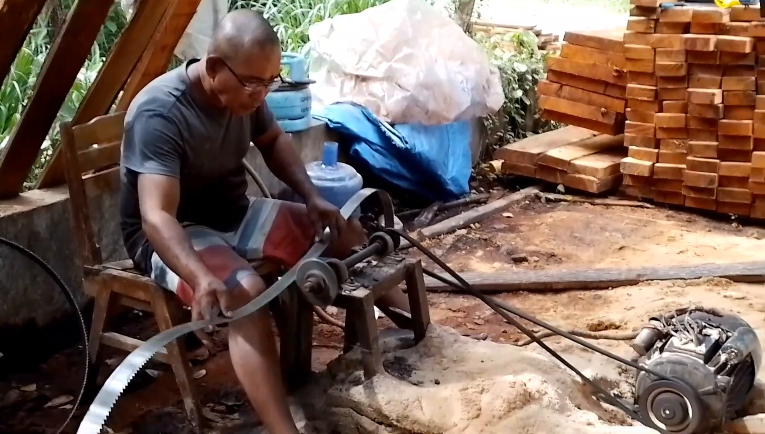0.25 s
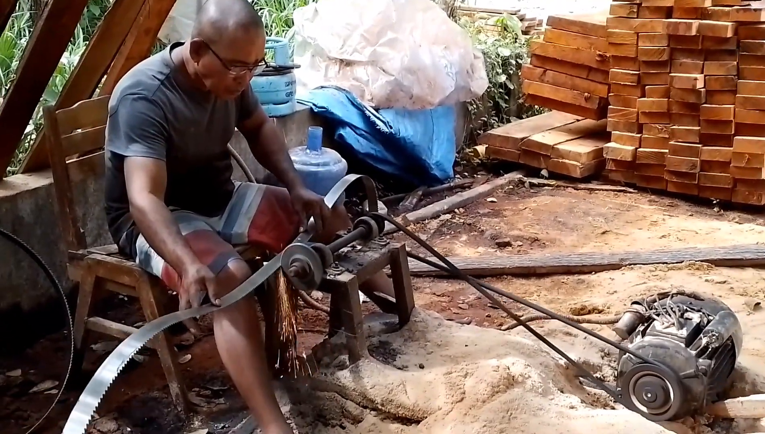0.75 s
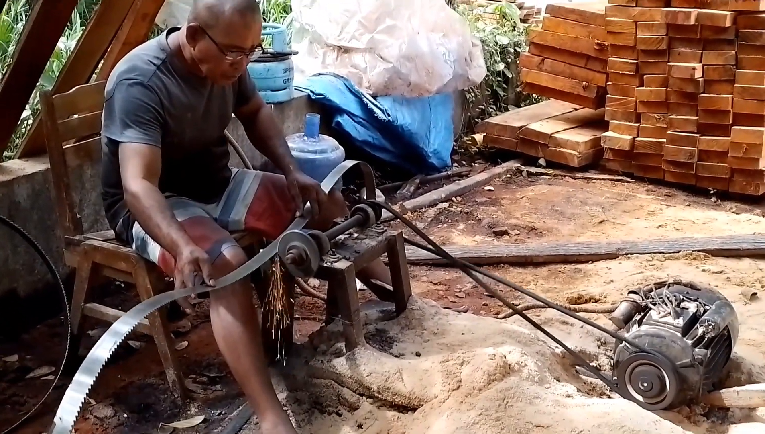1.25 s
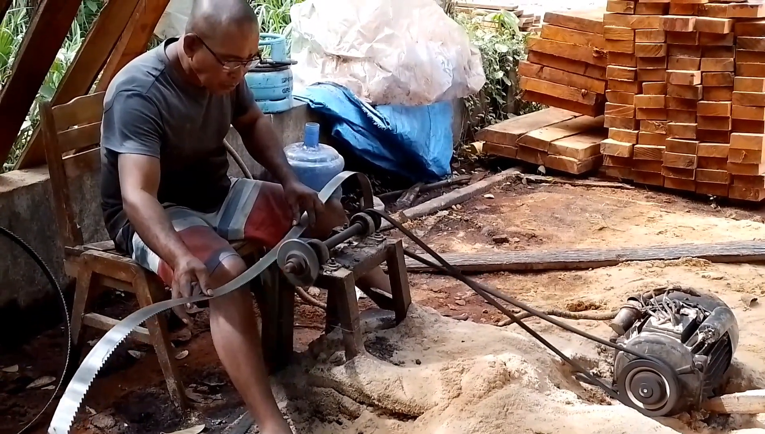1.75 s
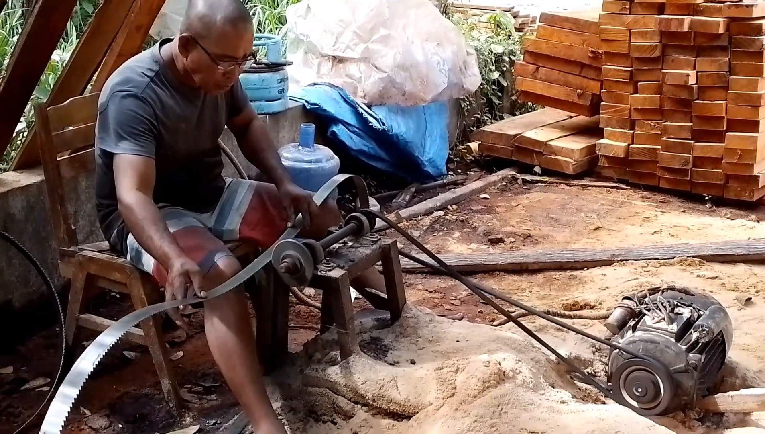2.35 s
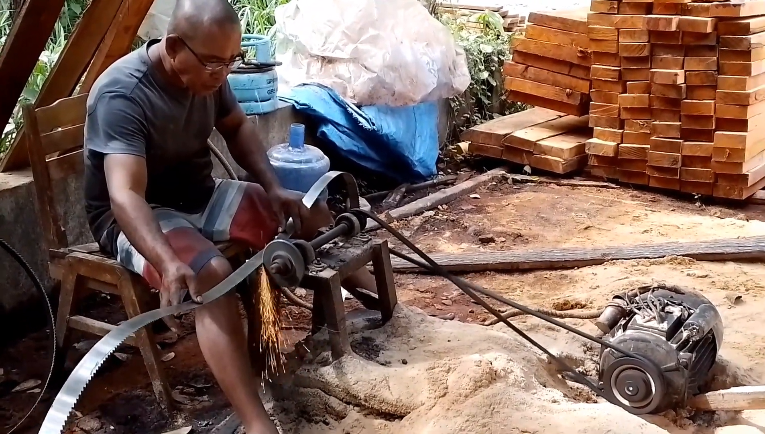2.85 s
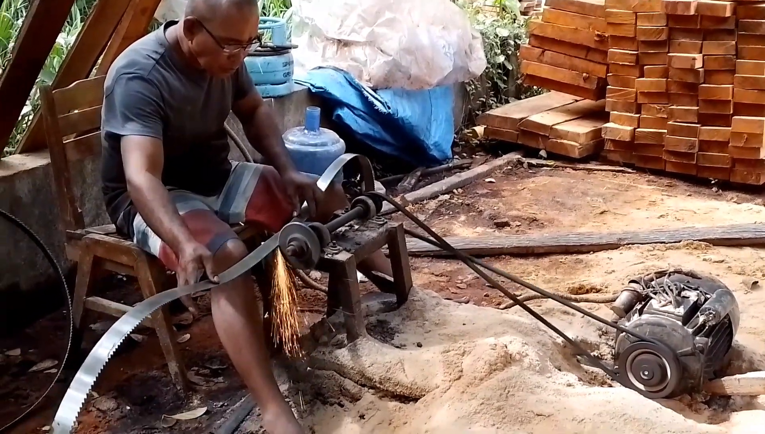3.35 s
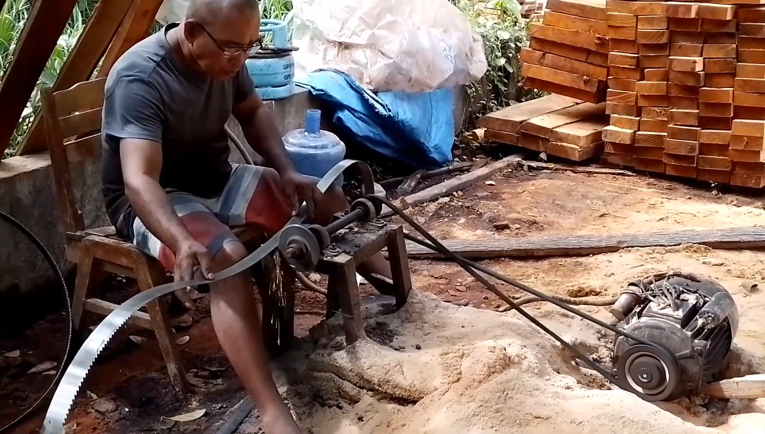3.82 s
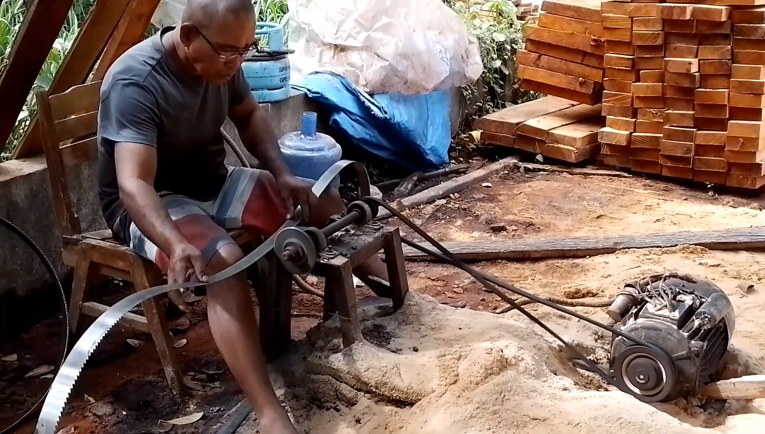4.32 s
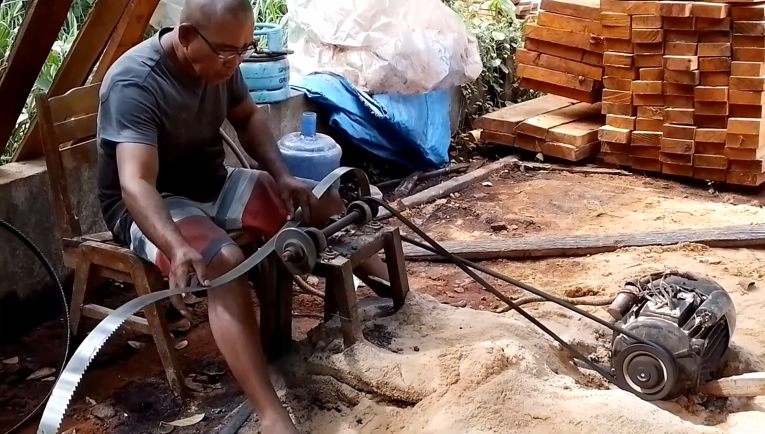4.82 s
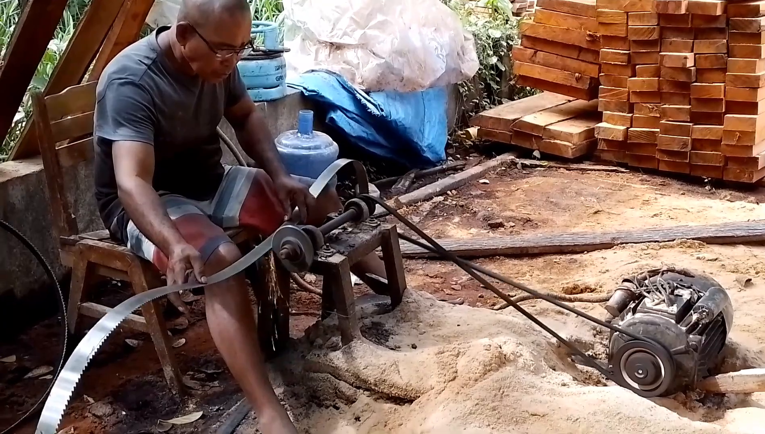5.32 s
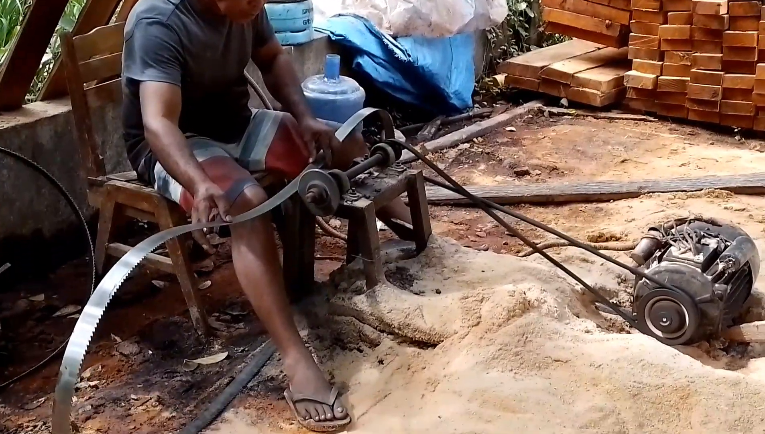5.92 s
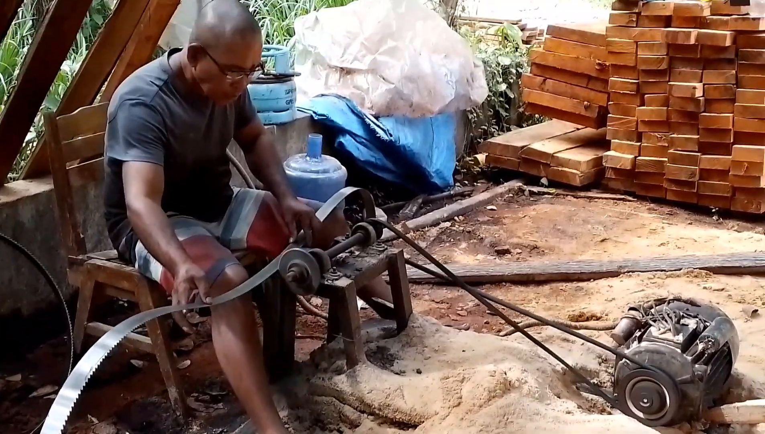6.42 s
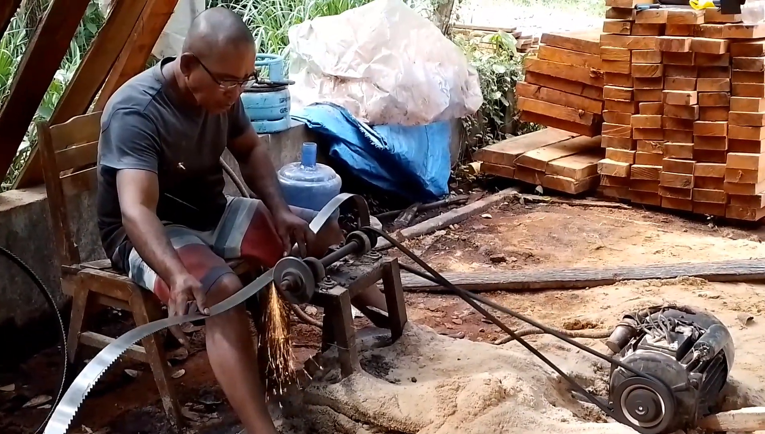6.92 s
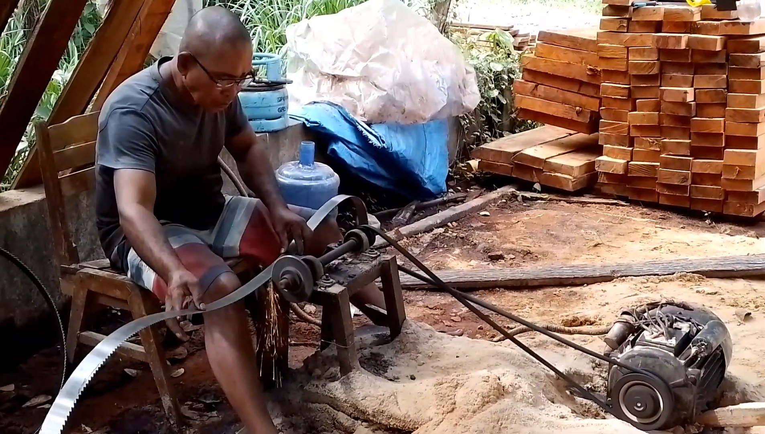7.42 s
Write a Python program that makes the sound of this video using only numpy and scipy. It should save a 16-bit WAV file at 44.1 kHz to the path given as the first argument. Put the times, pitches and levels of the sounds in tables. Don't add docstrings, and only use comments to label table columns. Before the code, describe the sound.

A saw blade is ground tooth by tooth, short hissing, ringing zings in quick steady rhythm above a rattling motor-driven wheel.

```python
import sys
import numpy as np
from scipy import signal
from scipy.io import wavfile
from scipy.ndimage import uniform_filter1d, minimum_filter1d

SR = 44100
rng = np.random.default_rng(int(sys.argv[2]) if len(sys.argv) > 2 else 0)


def to_wav(s):
    ch = np.atleast_2d(s).T
    pcm = np.round(np.clip(ch, -1, 1) * 32767)
    wavfile.write(sys.argv[1], SR, pcm.astype(np.int16))


def boost(x):
    u = np.asarray(x, float) / 20
    return 10 ** u


N = 338247
T = np.arange(N) / SR
HZ = np.fft.rfftfreq(2048, 1 / SR)

# f/Hz, level/dB
IDLE_LEFT = [(40, -45), (160, -56), (260, -23), (500, -38.5), (650, -25), (1250, -26), (2600, -15.5),
             (4100, -18.5), (5100, -19), (6000, -17), (7500, -8), (8000, -9.5), (10200, -24.5),
             (11700, -40)]
IDLE_RIGHT = [(40, -45), (160, -62), (260, -24.5), (500, -34.5), (650, -22), (1250, -19.5), (2600, -16),
              (4100, -24), (5100, -28.5), (6000, -22.5), (7500, -23.5), (8000, -47), (10200, -11.5),
              (11700, -27.5)]
# f/Hz, width/Hz, left lift/dB, right lift/dB
FRAME_MODES = [(94.5, 83, -4, 2.5), (114.6, 38, 25, 25.5), (413, 29, 9.5, 7.5), (734, 79, 7, 8),
               (770, 85, 5, -2.5), (920, 23.6, 21, -3), (1095, 10, 21, 5.5), (1590, 42, 16, -6),
               (2138, 65, 8.5, 3), (2236, 170, 6, 1), (2625, 110, -5, -14), (2990, 210, 5, 3.5),
               (3457, 34, 9, 11.5), (3708, 46, 11, -1.5), (4024, 230, 2.5, -12), (4373, 870, 7, 11),
               (4705, 51, 5.5, 6.5), (5130, 170, 0, -2.5), (5470, 190, -3, 6.5), (6134, 66, 9, -8),
               (6730, 590, 3, 1.5), (7620, 380, -7.5, -6), (8600, 45, 8, 4), (8520, 120, -30, -9),
               (9460, 100, 13, -17), (9970, 130, 11, 14.5)]
# f/Hz, likeness/1
MACHINE_LIKENESS = [(40, 0.92), (200, 1), (500, 0.65), (750, 0.87), (1200, 0.24), (1500, 0.95),
                    (1900, 0.13), (2200, 0.15), (2700, 0.075), (3700, 0.18), (5500, 0.1), (7500, 0.26),
                    (9500, 0.15), (11500, 0.14)]
# f/Hz, phase/rad
PORT_LAG = [(300, 0), (800, -0.26), (1500, 0.87), (1900, -1), (3000, -4.5), (7000, -9.5), (8500, -11),
            (10500, -12), (11000, -12), (11500, -10.5)]
# order/1, level/dB
HUM_ORDERS = [
    (3, -15),
    (4, 0),
]
# f/Hz, width/Hz, level/dB
GUARD_MODES = [
    (1368, 89, -5),
    (1457, 21, 3.5),
    (1522, 51, 2.5),
]
# f/Hz, level/dB
ROAR_LEFT = [(40, -50), (160, -32.5), (300, -19), (1000, -19), (2600, -15.5), (4200, -12.5), (5200, -13),
             (6500, -9.5), (7300, -1), (8000, 2.5), (8500, -3), (9000, -1), (11700, -40)]
ROAR_RIGHT = [(40, -49), (160, -35), (300, -19), (1000, -18.5), (2600, -15), (4200, -11), (5200, -15),
              (6500, -12), (9000, -10), (11700, -30)]
# f/Hz, level/dB
GRIT_LEFT = [(2500, -49), (4200, -16.5), (5200, -20), (6500, -14), (7000, -9.5), (7500, -1.5), (8000, 1),
             (8400, -4.5), (9000, -14.5), (10300, -9.5), (10900, -22.5), (11700, -12.5)]
GRIT_RIGHT = [(2500, -53), (4200, -30), (6500, -33), (7500, -42), (7900, -10.5), (9000, -8), (9900, -1.5),
              (10500, 3.5), (10900, -11), (11300, -8.5), (11600, -12.5), (12100, -28)]
# f/Hz, width/Hz, left lift/dB, right lift/dB
BLADE_MODES = [(4120, 57, 14, -10), (4900, 47, 16, 11), (5860, 120, 9.5, -9), (6940, 50, 3, 1),
               (7600, 21, 4, -1), (7920, 15, 5, -11), (7910, 44, 5, 6), (8710, 117, 4, 7),
               (9700, 49, -16, -5), (9245, 300, 10.5, 0), (10540, 150, 7.5, -5), (11900, 150, -17, 6)]
# f/Hz, likeness/1
GRIT_LIKENESS = [(5000, .3), (7300, .45), (7800, .25), (8300, 0.64), (8800, 0.18), (9400, 0.71),
                 (10400, 0.36), (11000, 0.26), (11600, 1)]
# start t/s, rise t/s, pressure level/dB
TOUCHES = [(-0.1, .05, -18), (0.6, 0.072, -15), (1.3, 0.095, -13.5), (2.03, 0.019, -14.5),
           (2.67, 0.035, -15), (3.31, 0.034, -15.5), (3.95, 0.045, -15.5), (4.59, 0.03, -14),
           (5.26, 0.14, -17), (6.07, 0.045, -14), (6.81, 0.021, -13.5), (7.48, 0.091, -7.5)]
# push t/s, lift t/s, release t/s, push level/dB, lift level/dB
BITES = [(0.056, 0.254, 0.092, -14, -16), (0.705, 0.943, .03, -13, -15), (1.483, 1.704, 0.06, -12, -12.5),
         (2.14, 2.339, .08, -10, -11.5), (2.792, 3.035, 0.019, -9, -14), (3.4, 3.61, 0.045, -12, -12),
         (4.06, 4.272, .06, -11.5, -12), (4.672, 4.86, 0.13, -10, -13.5), (5.497, 5.726, 0.028, -13.5, -13),
         (6.215, 6.374, 0.19, -13, -11), (6.914, 7.106, 0.12, -12.5, -11.5), (7.623, 7.85, .06, -9, -13)]
BITE_DEPTHS = [.8, .95, 0.87, 1, .95, 0.93, .9, 1, 0.88, 0.93, 1, 0.85]
# t/s, half length/s, level change/dB
SLIPS = [(0.047, .02, 6.5), (0.344, .04, -6), (0.5, .12, 0), (0.978, .02, -4), (1.03, 0.025, 5),
         (1.455, .06, -2.5), (2.144, 0.023, -6), (2.508, .1, -2), (3.07, 0.025, -9), (3.347, .04, -1),
         (3.846, 0.02, 7), (3.917, .02, 6.5), (4.39, .05, 5), (5.13, 0.074, -5), (5.23, .04, -1),
         (5.295, 0.022, 6.5), (5.34, .03, 0.5), (5.858, 0.067, -3), (6.21, .04, -1), (6.6, .05, 4),
         (6.726, 0.074, 0.5), (6.914, .05, -2), (7.38, 0.052, -2), (7.634, 0.036, -11)]
# f/Hz, level/dB
BAND_FLOOR = [(700, -140), (1300, -78), (1900, -63), (2600, -62), (4000, -60.5), (5300, -62.5),
              (7500, -65.5), (9000, -65), (11300, -68), (12000, -62)]

WHEEL_HZ = 73.9
REST_DB = -23.5


def evened(x):
    return x / np.sqrt(np.mean(x ** 2) + 1e-20)


def read(points):
    f, value = np.transpose(points)
    return np.interp(np.log(HZ + 1), np.log(f + 1), value)


def resonances(modes):
    return sum(np.outer(db, 1 / (1 + (2 * (HZ - hz) / width) ** 2)) for hz, width, *db in modes)


def wander(rate_hz):
    lowpass = signal.butter(2, rate_hz, fs=SR, output="sos")
    return evened(signal.sosfilt(lowpass, rng.standard_normal(N)))


def coloured(drive, db, likeness, patchy_db, bins, frames):
    a, b = signal.stft(drive, nperseg=2048, noverlap=1536)[2]
    same = np.clip(likeness, 0, 1)[:, None]
    right = (same * a + np.sqrt(1 - same ** 2) * b) * np.exp(-1j * read(PORT_LAG))[:, None]
    pair = np.array([a, right])
    patches = uniform_filter1d(rng.standard_normal(a.shape), bins, 0)
    patches = evened(uniform_filter1d(patches, frames, 1))
    pair *= boost(db[:, :, None] + patchy_db * patches)
    return signal.istft(pair, nperseg=2048, noverlap=1536)[1][:, :N]


def wheel_beat(once_db, twice_db):
    turn = 2 * np.pi * WHEEL_HZ * T
    return boost(once_db * np.sin(turn) + twice_db * np.sin(2 * turn + 1.0))


def pressure_db():
    push_s = 0.04
    corners = []
    for (touch, rise, light_db), (push, lift, release, push_db, lift_db) in zip(TOUCHES, BITES):
        corners += [(touch, REST_DB), (touch + rise, light_db)]
        corners += [(push, light_db), (push + push_s, push_db)]
        corners += [(lift, lift_db), (lift + release, REST_DB)]
    s, db = np.transpose(corners)
    slips = sum(change * np.maximum(1 - abs(T - at) / half, 0) for at, half, change in SLIPS)
    return np.interp(T, np.maximum.accumulate(s), db) + slips


def bite(lag_s=0):
    shape_s = np.cumsum([0, 0.045, 0.15, 0.12])
    cut = [0, 0.82, 0.62, 0]
    return sum(depth * np.interp(T - lag_s - row[0], shape_s, cut) for row, depth in zip(BITES, BITE_DEPTHS))


def ducked_db(free_db, duck_db, wander_db, wander_hz):
    lead_s, smooth_s = 0.002, 0.049
    duck = uniform_filter1d(bite(-lead_s), round(smooth_s * SR))
    return free_db + duck_db * duck + wander_db * wander(wander_hz)


def machine():
    drive = evened(rng.standard_normal((2, N)) * boost(0.85 * wander(170)) * wheel_beat(0.36, 0.37))
    db = np.array([read(IDLE_LEFT), read(IDLE_RIGHT)]) + resonances(FRAME_MODES) - 1.5
    rattle = coloured(drive, db, read(MACHINE_LIKENESS), 2.41, bins=3, frames=8)

    turns = np.cumsum(WHEEL_HZ * (1 + 0.0023 * wander(10.2))) / SR
    hum = sum(boost(db + 3.5 + 2.5 * wander(40)) * np.sin(2 * np.pi * k * turns) for k, db in HUM_ORDERS)

    boom = signal.sosfiltfilt(signal.butter(3, 680, fs=SR, output="sos"), rattle)
    rattle = rattle - boom * (1 - boost(-0.4 * (pressure_db() - REST_DB)))
    return rattle * boost(-8.0 * bite()) + hum * boost(ducked_db(-44, -17, 0.4, 14))


def guard():
    drive = evened(rng.standard_normal((2, N)) * boost(1.0 * wander(56)) * wheel_beat(0.6, 0.55))
    power = sum(boost(2 * db) / (1 + (2 * (HZ - hz) / width) ** 2) ** 2 for hz, width, db in GUARD_MODES)
    db = 10 * np.log10(power) + np.array([[0.4], [-0.4]])
    ringing = evened(coloured(drive, db, 0.67 + 0 * HZ, 0.52, bins=3, frames=6))
    return ringing * boost(ducked_db(-31, -12.5, 1.8, 15))


def roar():
    db = np.array([read(ROAR_LEFT), read(ROAR_RIGHT)])
    noise = coloured(rng.standard_normal((2, N)), db, 0 * HZ, 3.13, bins=2, frames=8)
    return noise * np.clip(bite(), 0, 1) ** 1.4


def grinding():
    strikes_per_s = 900
    sparks = boost(2.1 * np.minimum(rng.exponential(1, N), 5)) * (rng.random(N) < strikes_per_s / SR)
    sparks = signal.lfilter([1], [1, -0.97], sparks)
    chatter = boost(0.5 * wander(120) + 1.0 * wander(15)) * wheel_beat(0.6, 0.5)
    drive = evened(rng.standard_normal((2, N)) * (1 + 0.24 * sparks) * chatter)
    db = np.array([read(GRIT_LEFT), read(GRIT_RIGHT)]) + resonances(BLADE_MODES)
    rasp = coloured(drive, db, read(GRIT_LIKENESS), 3.6, bins=2, frames=8)
    return evened(rasp) * boost(pressure_db() + 1.0 * wander(6) + 1.5)


def scene():
    return machine() + guard() + roar() + grinding()


def starved(z, floor_db, size, count):
    bands = uniform_filter1d((abs(z) ** 2).reshape(256, 4, -1).mean(1), size=3, axis=1)
    kept = minimum_filter1d(1.0 * (bands > boost(2 * floor_db)), size=size, axis=1)
    return z * np.repeat(minimum_filter1d(kept, size=count, axis=0), 4, axis=0)


def thrifty(x):
    z = signal.stft(x, nperseg=2048, noverlap=1536)[2]
    band_hz = HZ[:1024:4, None]
    rasp = uniform_filter1d((abs(z[:, 320:500]) ** 2).mean((0, 1)), size=9)
    strain_db = np.minimum(10 * np.log10(rasp + 1e-12) + 45, 10)
    floor_db = read(BAND_FLOOR)[:1024:4, None] + 0.45 * strain_db
    left, right = (starved(port, floor_db, size=5, count=2) for port in z[:, :1024])

    thin_db = floor_db - 2.8 + 0.35 * strain_db + strain_db * np.clip(band_hz / 8000 - 0.28, 0, 0.3)
    middle = (left + right) / 2
    lost = (middle - starved(middle, thin_db, size=4, count=1)) * (HZ[:1024, None] < 6500)
    z[:, :1024] = left - lost, right - lost
    return signal.istft(z, nperseg=2048, noverlap=1536)[1][:, :N]


def band_limit(x):
    return signal.sosfilt(signal.butter(12, 12380, fs=SR, output="sos"), x)


def record(dry):
    room_left = np.minimum(0.93 / (abs(dry).max(0) + 1e-9), 1)
    limited = dry * uniform_filter1d(minimum_filter1d(room_left, size=61), size=61)
    limited = signal.sosfilt(signal.butter(2, 45, "high", fs=SR, output="sos"), limited)
    edges = [signal.firwin(1001, hz, window=("kaiser", 9), fs=SR) for hz in (11850, 12200)]
    limited = signal.oaconvolve(limited, np.array(edges), "same", axes=1)
    mix = np.clip(thrifty(limited), -1, 1)
    return band_limit(mix)


dry = scene()
out = record(dry)
to_wav(out)
```